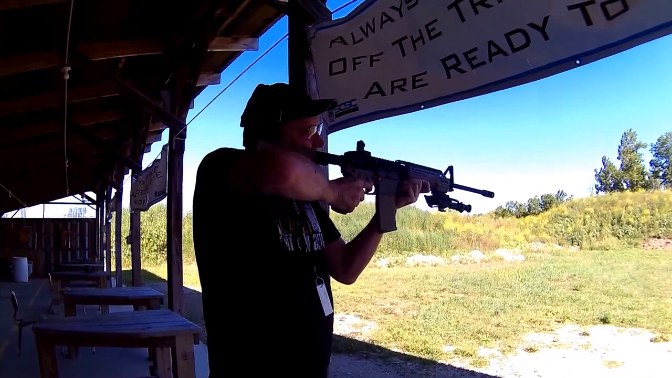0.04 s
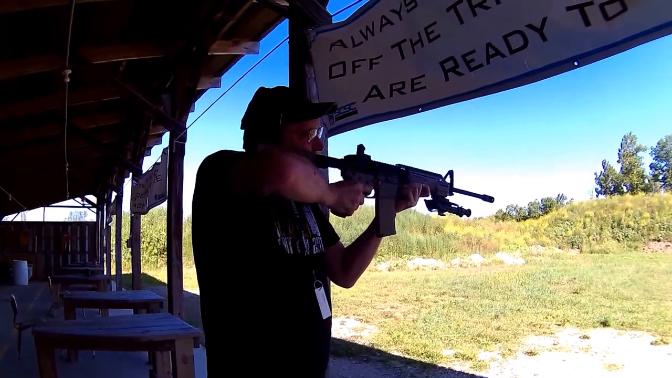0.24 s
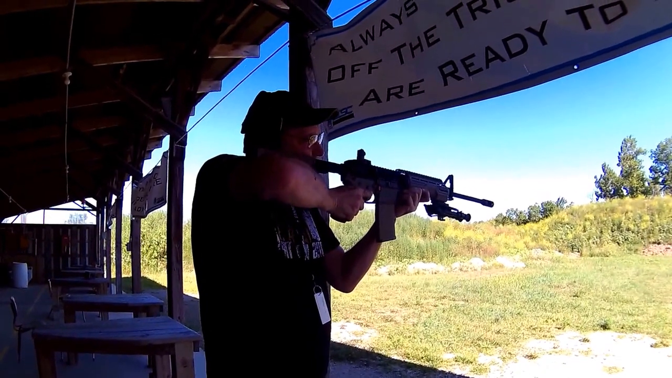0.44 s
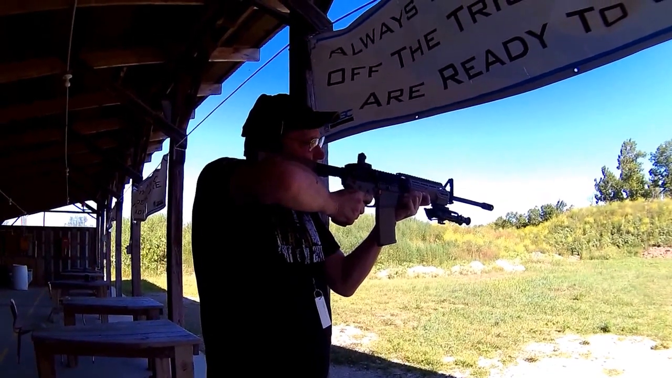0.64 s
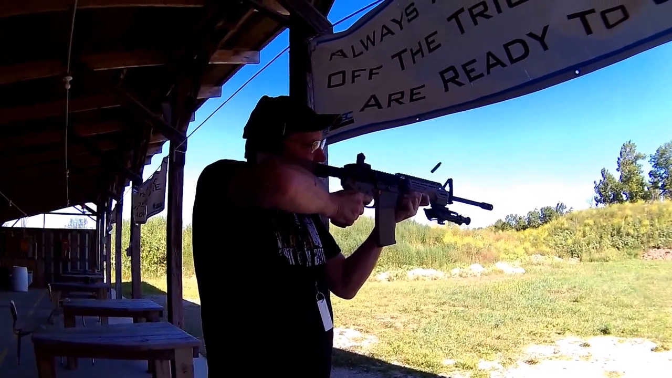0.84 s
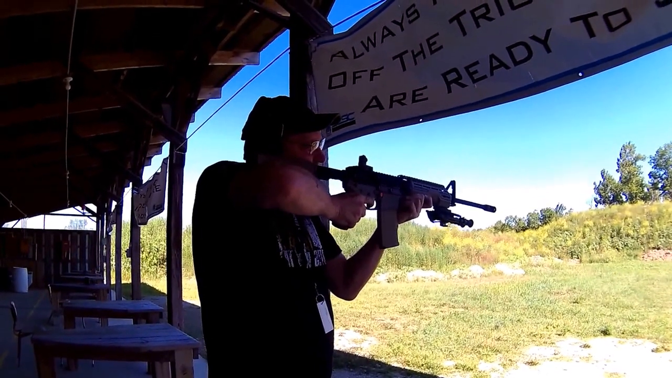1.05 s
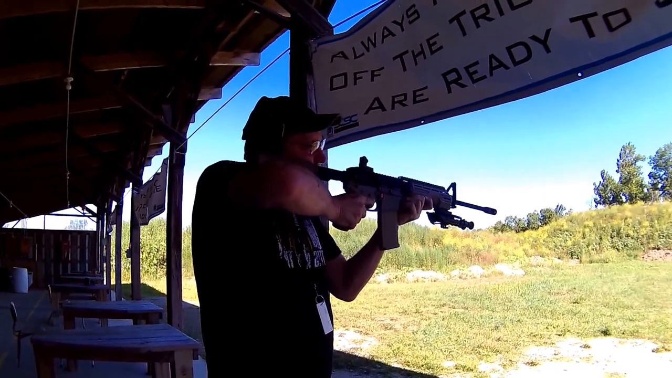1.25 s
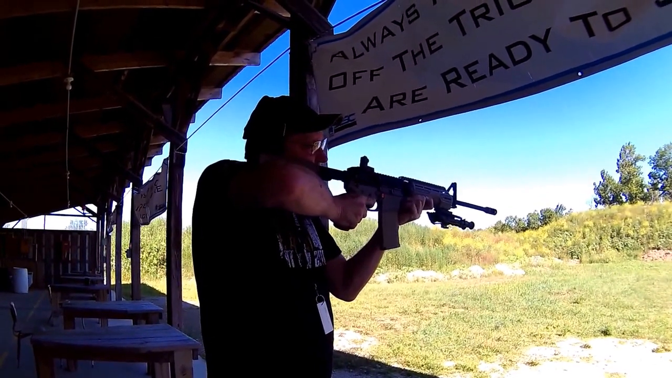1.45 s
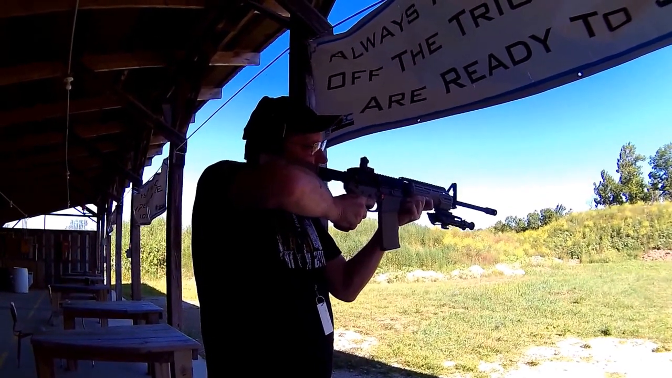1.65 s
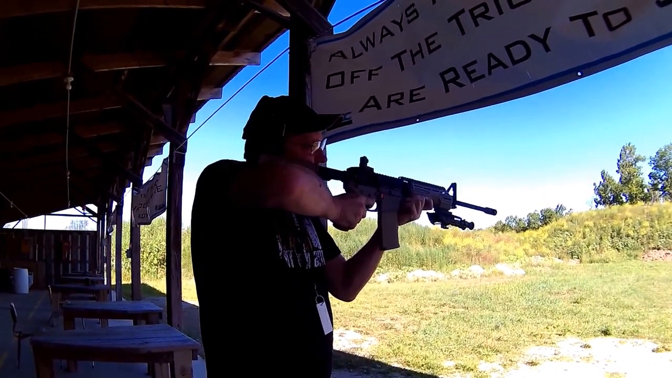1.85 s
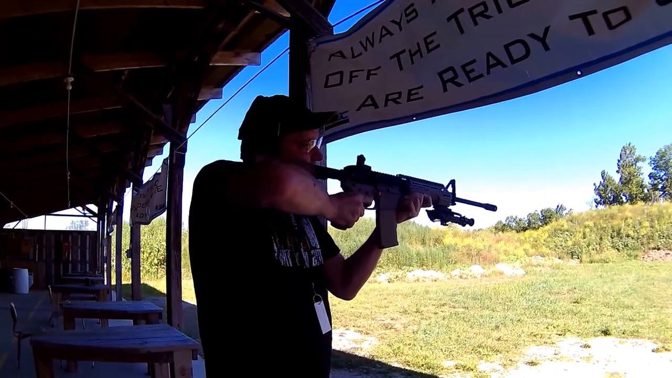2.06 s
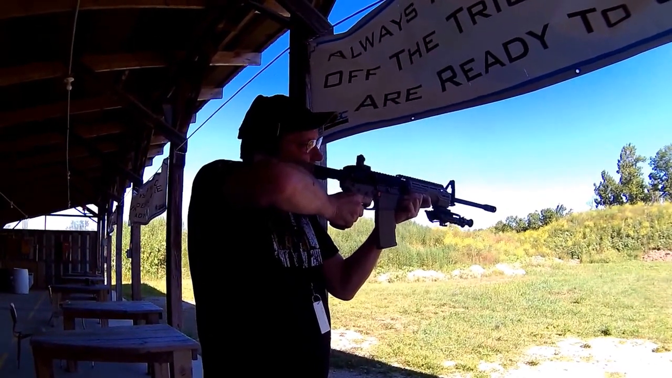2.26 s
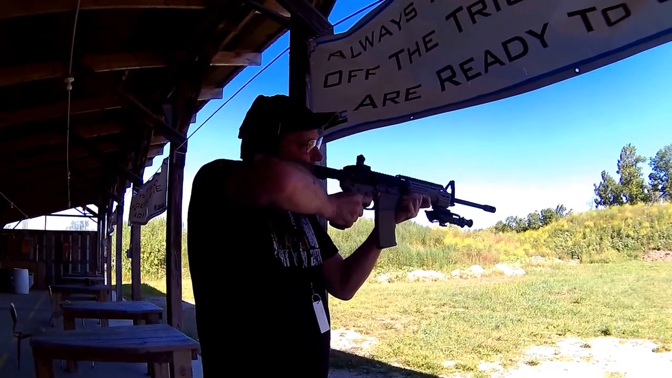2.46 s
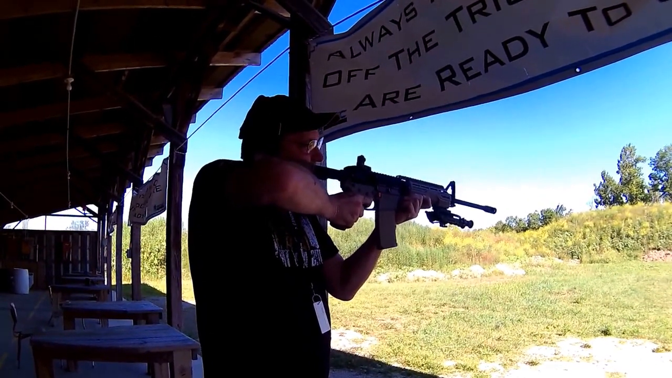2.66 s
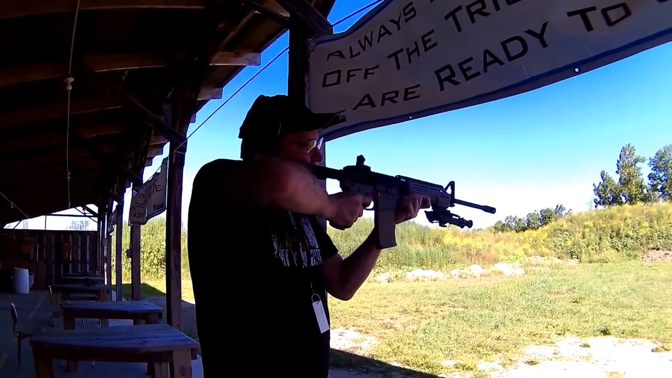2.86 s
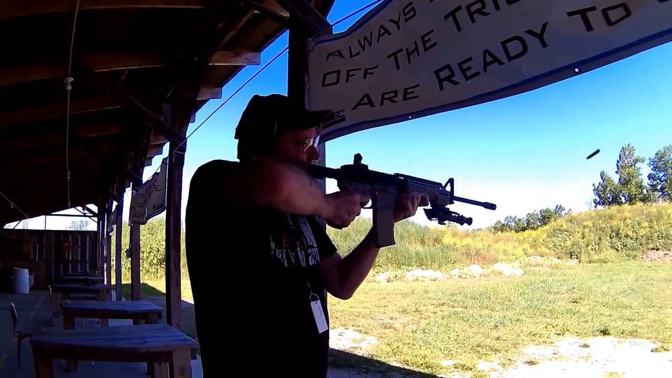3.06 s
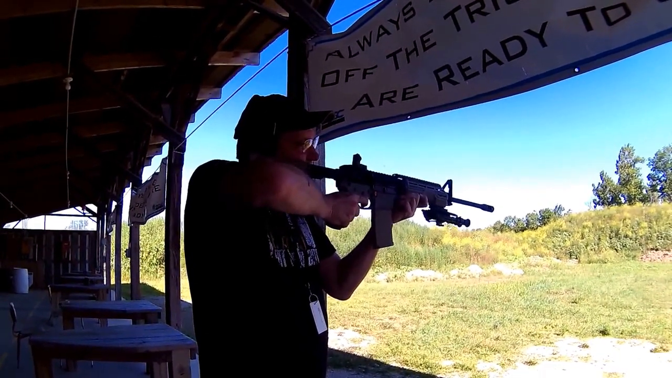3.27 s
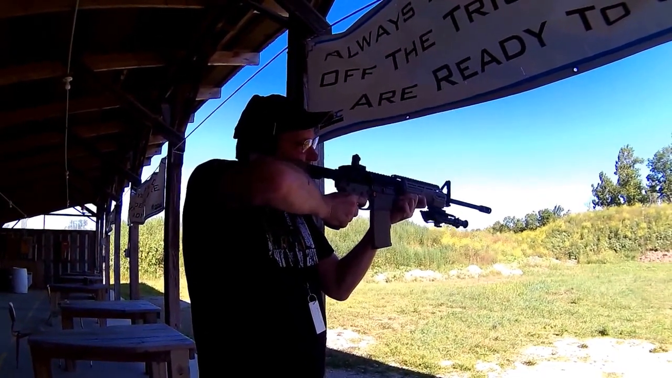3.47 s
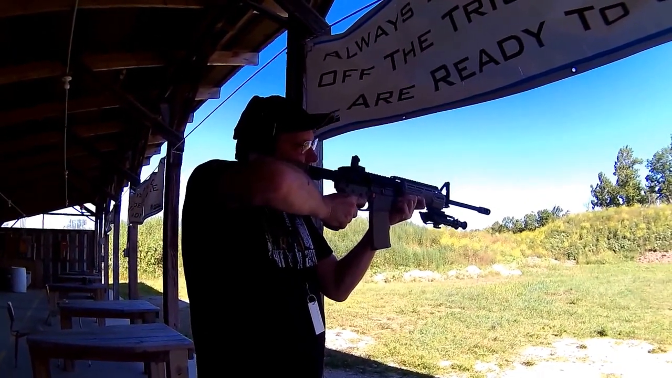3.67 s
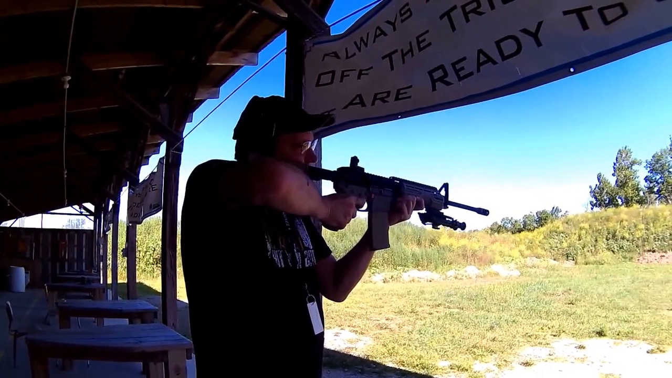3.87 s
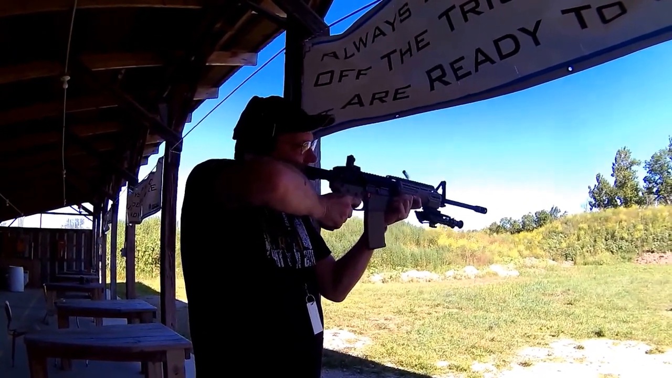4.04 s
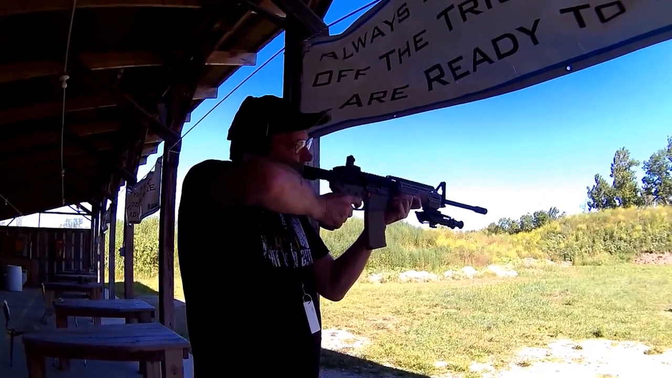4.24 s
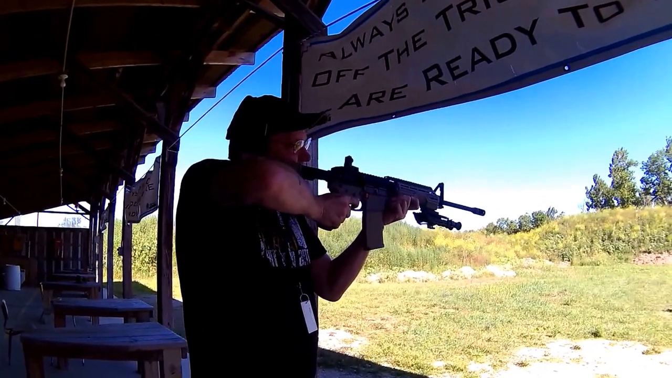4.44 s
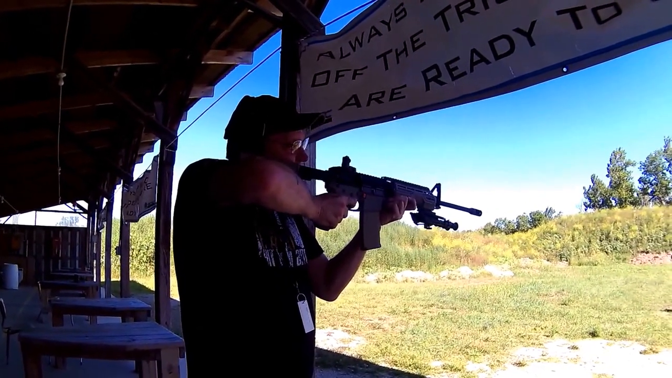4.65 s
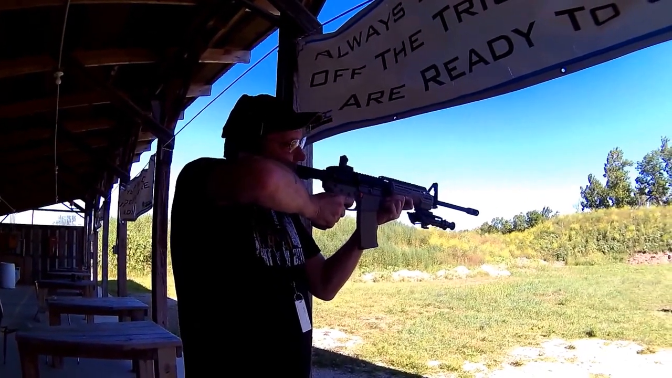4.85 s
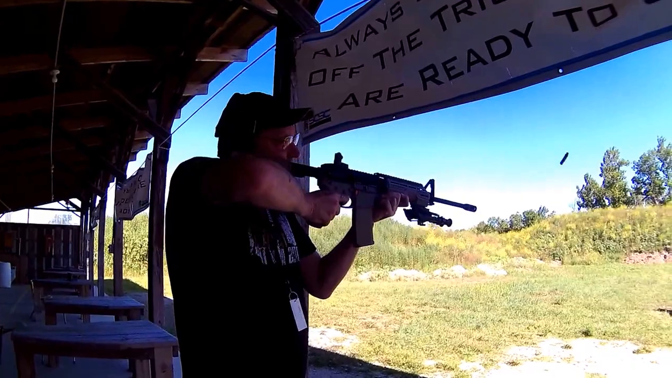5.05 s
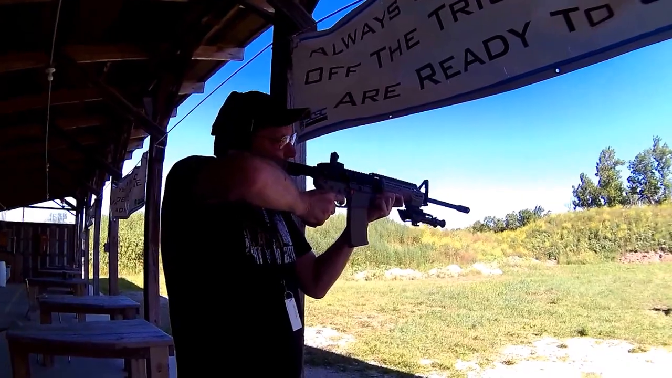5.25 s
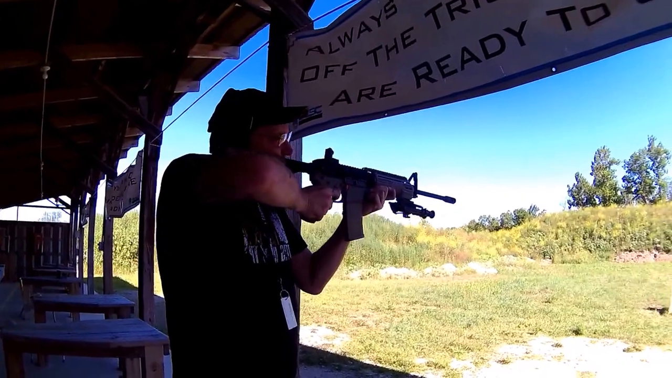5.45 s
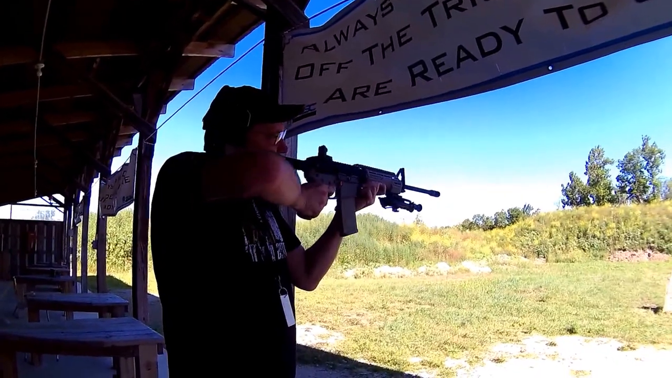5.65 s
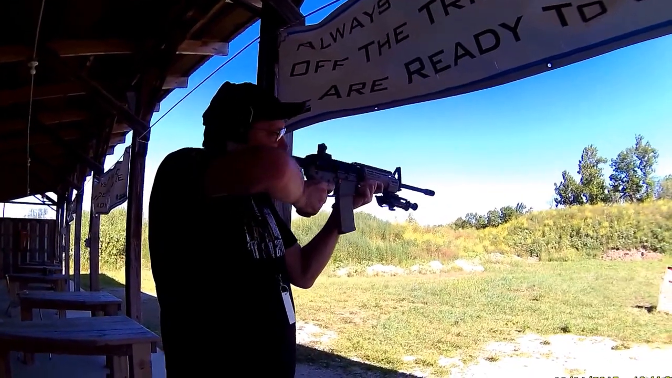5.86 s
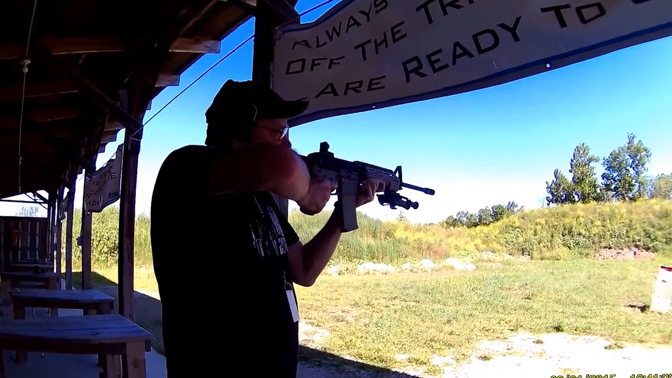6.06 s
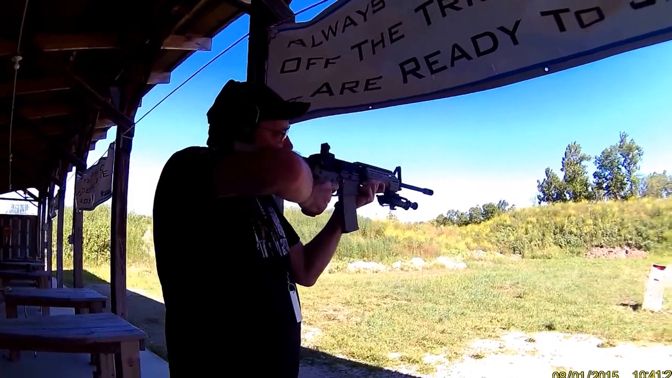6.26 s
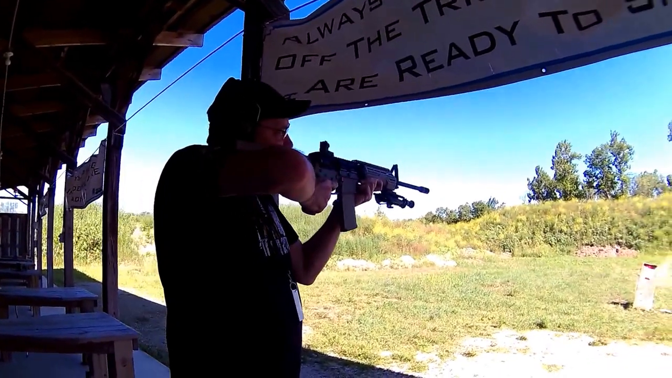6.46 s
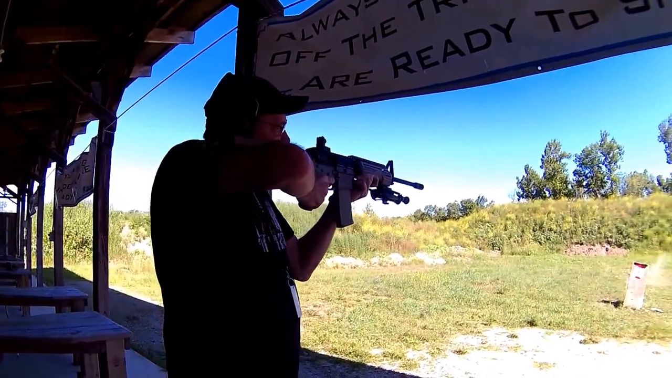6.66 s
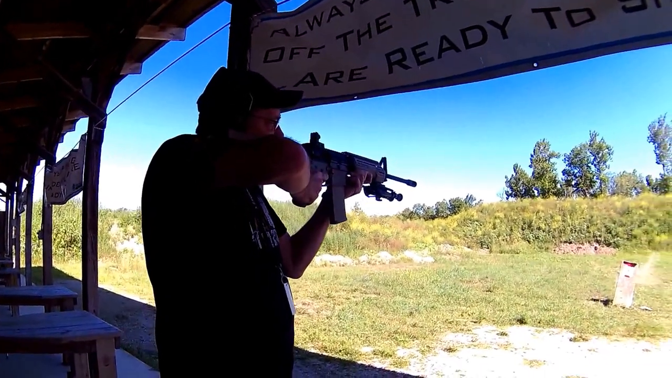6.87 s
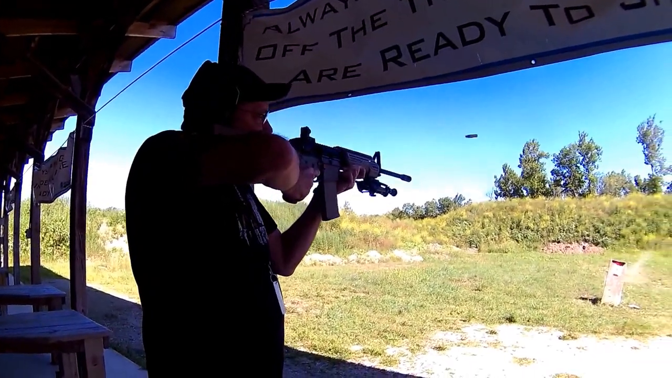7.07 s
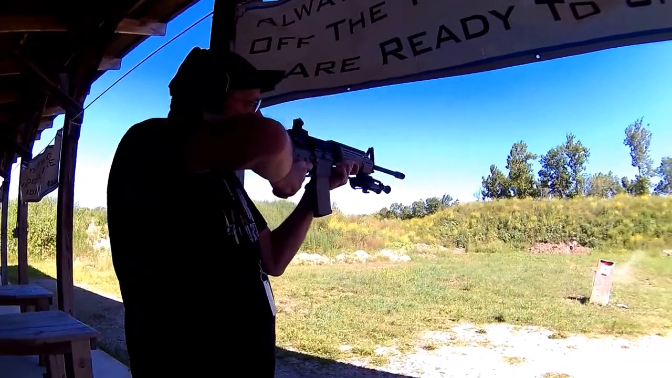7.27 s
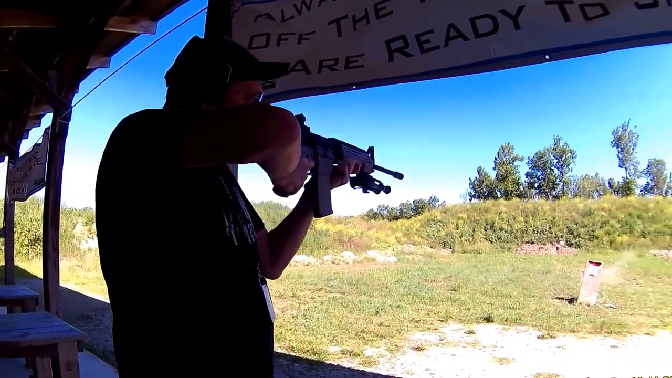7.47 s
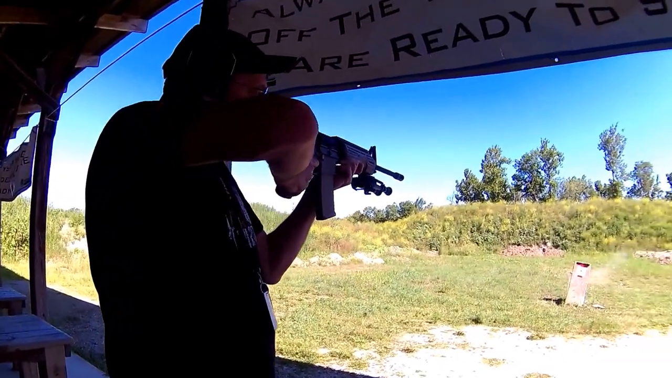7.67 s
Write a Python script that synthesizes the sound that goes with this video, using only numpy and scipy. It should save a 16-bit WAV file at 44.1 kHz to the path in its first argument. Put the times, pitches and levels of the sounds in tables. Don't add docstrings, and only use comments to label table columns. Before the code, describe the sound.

A rifle fires six loud, overloaded single shots at an outdoor range, with hard wall claps, fading landscape echoes and small ringing shell cases between.

```python
import sys
import numpy as np
from scipy import signal
from scipy.io import wavfile
from scipy.ndimage import uniform_filter1d

SR = 44100
rng = np.random.default_rng(int(sys.argv[2]) if len(sys.argv) > 2 else 0)


def amplitude_ratio(level_db):
    exponent = np.asarray(level_db, float) / 20
    return 10 ** exponent


def master(y):
    cut = np.clip(np.atleast_2d(y).T, -1, 1)
    pcm = np.round(cut * 32767)
    wavfile.write(sys.argv[1], SR, pcm.astype(np.int16))


N = 340126

# blast t/s, limiter wakes t/s
BLASTS = [(.7282, .8514), (1.8104, 1.8437), (2.8707, 2.9361), (3.9615, 3.9889), (4.8508, 4.8906),
          (6.8867, 6.9754)]
# blast level/dB, hammer level/dB, stretch of the near paths/1
SHOTS = [
    (-1.5, -16, 0.94),
    (1, -15, 0.92),
    (-2, -13, 0.99),
    (-1, -14, 1.02),
    (-1, -13, 0.981),
    (2.5, -16.5, 0.89),
]
# f/Hz, level/dB
PORT = [(2900, -1), (3300, -2.5), (3650, 0), (4100, 6.5), (4500, 1.5), (5100, 2), (7200, -1.5), (8200, -4),
        (12000, 3), (12900, -10.5), (16000, -18.5)]
# level/dB, walls/dB, treble/dB
AIM = [
    (-0.5, -2.5, -0.7),
    (.5, -2, -0.5),
    (0, 0, -0.15),
    (.5, 0, 0.1),
    (1, -7, .3),
    (0, -2.5, -0.9),
    (0, -.5, -1),
]
FAR_STRETCH = [1, 1, 1, 1, 1, 1, .98]
FAR_SHOTS = [-0.3] + [blast for blast, _ in BLASTS]


def evened(x):
    return x / np.sqrt(np.mean(x ** 2) + 1e-20)


def smoothed(x, size, axis=-1):
    return uniform_filter1d(uniform_filter1d(x, size=size, axis=axis), size=size, axis=axis)


def read(points, hz):
    f, value = np.transpose(points)
    return np.interp(np.log(hz + 1), np.log(f + 1), value)


def add(mix, s, sound):
    part = mix[round(s * SR):][:len(sound)]
    part += sound[:len(part)]


def hiss(colour_db, length, patchy_db, size=512):
    hop = size // 4
    frames = length // hop + 5
    hz = np.fft.rfftfreq(size, 1 / SR)[:, None]
    real, imaginary, patches = rng.standard_normal((frames, len(hz), 3)).T
    patches = uniform_filter1d(uniform_filter1d(patches, size=8, axis=0), size=8, axis=1)
    patches = evened(patches)
    gain = amplitude_ratio(colour_db(hz, np.arange(frames) * hop / SR)) * np.ones(real.shape)
    gain = gain / np.sqrt((gain ** 2).mean(0)) * amplitude_ratio(patchy_db * patches)
    spectrum = (real + 1j * imaginary) * gain
    return evened(signal.istft(spectrum, nperseg=size, noverlap=size - hop)[1][:length])


def ring(modes, length, rise=.0001):
    t = np.arange(length) / SR
    sines = sum(amplitude_ratio(db - 60 * t / t60) * np.sin(2 * np.pi * hz * t) for hz, db, t60 in modes)
    return (1 - np.exp(-t / rise)) * sines


def blasts():
    # delay t/s, level/dB
    near = [(0, -6), (.002, 12), (.08, 16), (.16, 5), (.225, -7), (.25, -9), (.265, -13.5), (.276, -18),
            (.289, -14)]
    # f/Hz, density/dB per Hz
    near_colour = [(18, -47.5), (30, -24), (70, -15), (345, -5.5), (866, -2), (1670, -5.5), (3000, -22),
                   (6900, -32.5), (16000, -53)]
    boom_share = [(500, 1), (1700, 0)]  # f/Hz, share/1

    def colour(hz, age):
        dulling_db = 48 * (age - .24) * hz / 8000
        late_db = -16 * np.maximum(1 - age / 0.031, 0)
        boom_db = 5.5 - 25.5 * age + late_db
        return read(near_colour, hz) + read(PORT, hz) - dulling_db + read(boom_share, hz) * boom_db

    out, t = np.zeros(N), np.arange(16000) / SR
    for (s, _), (blast_db, _, stretch) in zip(BLASTS, SHOTS):
        past = np.maximum(t / stretch - near[-1][0], 0)
        level_db = blast_db + np.interp(t / stretch, *np.transpose(near))
        level_db = level_db - 14 * np.minimum(past / 0.0022, 1) - 320 * past
        shock = 1.4 * (1 - t / 0.00013) * np.exp(-t / 0.00033) * np.minimum(t / .0004, 1)
        add(out, s, shock + hiss(colour, len(t), patchy_db=0.0) * amplitude_ratio(level_db))
    return out


def hammer_clicks():
    # f/Hz, level/dB, decay t60/s
    hammer = [(1740, -8, .025), (2664, -14.5, 0.015), (4630, 0, 0.0096), (5690, -15, 0.0092),
              (8720, -16, 0.0037), (11480, -3, 0.0033), (14600, -9.5, 0.00406)]
    out = np.zeros(N)
    for (s, _), (_, hammer_db, _) in zip(BLASTS, SHOTS):
        rattle = rng.standard_normal(size=500) * amplitude_ratio(-60 * np.arange(500) / SR / 0.014)
        click = np.convolve(ring(hammer, 900), rattle)
        add(out, s - .0084, amplitude_ratio(hammer_db) * click / abs(click).max())
    return out


def far_echoes():
    # delay t/s, hold t/s, level/dB, fall/dB per s, low middle/dB
    belts = [
        (.2, .07, -17, 304.5, -1.5),
        (.3, .09, -25.5, 153.5, -10),
        (0.43, 0.083, -26, 71.5, -8),
        (0.57, 0.12, -31.5, 122.5, -4.5),
        (0.726, 0.18, -38.5, 38, -5),
        (1.05, 0.31, -50.5, 26, 6.5),
    ]
    # t/s, hold t/s, level/dB, fall/dB per s, low middle/dB
    strikes = [(.035, 0.041, -30.5, 150, -8), (1.046, 0.064, -19.5, 198, -15.5),
               (1.19, .12, -30.5, 64.5, -14), (1.36, .05, -34, 152, -10.5), (2.142, 0.037, -25, 200, -22.5),
               (2.258, 0.015, -23.5, 200, -14), (4.245, 0.043, -8.5, 220, -15.5),
               (4.37, 0.037, -25, 92, -16.5), (7.208, 0.016, -36.5, 150, -14.5),
               (7.39, .04, -31.5, 119, -10)]
    # f/Hz, density/dB per Hz
    far_colour = [(18, -49.5), (30, -7.5), (110, -11.5), (250, -11), (400, -13.5), (650, -4.5),
                  (1100, -1.5), (1500, 0), (1900, -3.5), (2400, -9.5), (4000, -19), (7000, -25.5),
                  (12000, -47.5), (16000, -53.5)]
    # f/Hz, share/1
    share_treble = [(1300, 0), (2400, 0.3), (5000, 1), (12000, 3.3), (16000, 6.0)]
    share_bass = [(60, 0.56), (250, 1), (450, 0.219)]
    share_low = [(300, 0.076), (640, 1), (1000, 0.0018), (1500, 0)]

    rows = []
    for shot, (aim_db, _, _), stretch in zip(FAR_SHOTS, AIM, FAR_STRETCH):
        rows += [(shot + delay * stretch, hold, db + aim_db, *rest) for delay, hold, db, *rest in belts]
    start, hold, db, fall_db, low = np.transpose([*rows, *strikes])[..., None]
    s = np.arange(0, N / SR, 1 / 1000)
    rising_db = 897.5 * np.maximum(start - s, 0)
    falling_db = fall_db * np.maximum(s - start - hold, 0)
    power = amplitude_ratio(2 * (db - rising_db - falling_db)) + 1e-12
    low_db = (power * low).sum(0) / power.sum(0)

    last = np.searchsorted(FAR_SHOTS, s) - 1
    age = s - np.array(FAR_SHOTS)[last]
    air_s, forest_s = 1.45, 0.98
    treble_db = 8 + np.array(AIM)[last, 2] - 15 * np.minimum(age, air_s)
    treble_db = treble_db - 29 * np.clip(age - forest_s, 0, air_s - forest_s)
    bass_db = 7.5 - 25 * np.minimum(age, 0.61) + 0.5 * (low_db + 10.5)

    def colour(hz, t):
        treble = read(share_treble, hz) * np.interp(t, s, treble_db)
        bass = read(share_bass, hz) * np.interp(t, s, bass_db)
        low_middle = read(share_low, hz) * (np.interp(t, s, low_db) + 10.5)
        return read(far_colour, hz) + read(PORT, hz) + treble + bass + low_middle

    trunks = evened(uniform_filter1d(rng.standard_normal(3000), size=20))
    level_db = 10 * np.log10(power.sum(0)) + 0.34 * trunks[(age * 1000).astype(int)]
    grain = evened(uniform_filter1d(rng.standard_normal(N), size=150))
    level_db = np.interp(np.arange(N) / SR, s, level_db) + 0.48 * grain
    return hiss(colour, N, patchy_db=0.78) * amplitude_ratio(level_db)


def wall_claps():
    # delay t/s, peak level/dB
    walls = [
        (.314, -24),
        (.438, -16),
        (.848, -27),
        (.8712, -12.5),
        (1.466, -39),
        (1.608, -41),
    ]
    clap_modes = [(1020, -5, 0.009), (1880, -6, 0.006), (2700, -12, .005), (4080, -20, .006)]
    clap = ring(clap_modes, 900, rise=0.0004)
    out = np.zeros(N)
    for shot, (_, wall_db, _), stretch in zip(FAR_SHOTS, AIM, FAR_STRETCH):
        for delay, db in walls:
            arrival = shot + delay * stretch
            add(out, arrival + 0.00069, -amplitude_ratio(db + wall_db + 1.5) * clap)
            add(out, arrival + .005, amplitude_ratio(db + wall_db - 2.5) * clap)
    return out


def brass_cases():
    # t/s, lower ring level/dB, lower ring f/Hz, upper ring level/dB, tick level/dB
    landings = [(0.4032, -42, 10650, -26.5, -16.5), (.4565, -60, 10750, -43.5, -43),
                (.9, -49, 11550, -42.5, -46), (1.1485, -58, 10400, -56, -50),
                (1.3943, -39.5, 10670, -37, -30), (1.7404, -38.5, 10720, -41.5, -44),
                (2.5472, -45, 10680, -45, -39), (2.7453, -68, 10800, -63.5, -58),
                (3.6143, -38.5, 10800, -37.5, -31), (3.903, -66, 10750, -58, -56),
                (3.937, -66, 10750, -66, -50), (4.6793, -35, 10700, -47.5, -36),
                (5.219, -49.5, 10800, -59, -48), (5.492, -61, 10790, -75, -60),
                (5.5476, -38, 10700, -28, -18), (5.557, -48, 10700, -30, -40), (6.04, -81, 10750, -66, -75),
                (7.6502, -61, 10800, -50.5, -62)]
    # f/Hz, level/dB, decay t60/s
    tick = [(4600, -5, .003), (6500, -2, .003), (8800, 1, .003), (11300, 2, .004)]
    out, length = np.zeros(N), 14000
    fresh = np.exp(-np.arange(length) / SR / .012)
    for s, low_db, low_hz, high_db, tick_db in landings:
        high_hz = 15080 + rng.uniform(-130, 130)
        # f/Hz, level/dB, decay t60/s, spread of the cluster f/Hz
        for hz, db, t60, split_hz in [(low_hz, low_db, 0.29, 110), (high_hz, high_db, .2, 130)]:
            below, above = rng.uniform(.6, 1.57, 2) * split_hz
            cluster = ring([(hz, db, t60), (hz - below, db - 5, .8 * t60), (hz + above, db - 5, 0.8 * t60),
                            (hz + 2.3 * above, db - 8, .5 * t60)], length)
            tumble = evened(smoothed(rng.standard_normal(length), 140))
            add(out, s, cluster * amplitude_ratio(4 * tumble * (1 - fresh) + 4 * fresh))
        add(out, s, amplitude_ratio(tick_db) * ring(tick, 200, rise=.00003))
    return out


def metal_ticks():
    # t/s, peak level/dB, centre f/Hz
    ticks = [(.418, -18, 9720), (.4055, -22, 5200), (1.4073, -21, 7270), (1.7396, -23.5, 2300),
             (1.739, -22, 6264), (3.6165, -34, 7100), (3.627, -36, 6500), (4.2673, -4, 11100),
             (5.558, -24, 7000), (5.5616, -20, 10050), (7.1155, -1, 6000)]
    out = np.zeros(N)
    for s, db, hz in ticks:
        modes = [(hz, 0, .005), (.8 * hz, -5, .004), (1.1 * hz, -6, .004)]
        add(out, s, amplitude_ratio(db) * ring(modes, 400, rise=.0003))
    return out


def under_roof(sound):
    t = np.arange(3000) / SR
    sparse = rng.standard_normal(len(t)) * (rng.random(len(t)) < .05) * (t > .002)
    roof = amplitude_ratio(-17.5 - 60 * t / 0.11) * sparse
    return sound + signal.oaconvolve(sound, roof)[:N]


def rustles():
    # t/s, length t/s, level/dB
    bursts = [
        (6.36, 0.13, -66),
        (7.135, 0.039, -22.5),
        (7.637, 0.018, -47),
    ]
    # f/Hz, density/dB per Hz
    rustle_colour = [(1200, -20), (2500, 0), (4200, 4), (7000, -8), (12000, -19), (15000, -32)]
    out = np.zeros(N)
    for s, length, db in bursts:
        count = round(length * SR)
        rustle = hiss(lambda hz, t: read(rustle_colour, hz), count, patchy_db=2.5)
        add(out, s, amplitude_ratio(db) * rustle * np.sqrt(np.hanning(count)))
    return out


def birds():
    # t/s, length t/s, start f/Hz, end f/Hz, level/dB
    chirps = [
        (6.056, 0.033, 6050, 6000, -64),
        (6.061, .03, 6400, 7200, -67),
        (6.075, 0.0302, 6200, 7000, -64),
        (6.142, .018, 3900, 4250, -58),
        (6.165, 0.027, 4150, 4170, -66),
    ]
    out = np.zeros(N)
    for s, length, start_hz, end_hz, db in chirps:
        glide = np.linspace(start_hz, end_hz, round(length * SR))
        hoarse = evened(uniform_filter1d(rng.standard_normal(3000), size=80))
        glide = glide + 55 * hoarse[:len(glide)]
        add(out, s, amplitude_ratio(db) * np.sin(2 * np.pi * np.cumsum(glide) / SR) * np.hanning(len(glide)))
    return out


def camera_whine():
    # f/Hz, level/dB
    whine = [(9905, -87), (9981, -76.5), (10018, -87), (10056, -79), (10137, -92)]
    t = np.arange(N) / SR
    return sum(np.sqrt(2) * amplitude_ratio(db + 4.0) * np.sin(2 * np.pi * (hz * t + rng.random())) for hz, db in whine)


def far_hum():
    # f/Hz, density/dB per Hz
    hum = [(15, -24), (30, 3), (97, -2.5), (160, -5.5), (250, -12), (420, -17), (650, -17.5), (950, -12),
           (1750, -26), (2600, -31.5), (5800, -35.5), (6600, -33), (8500, -37.5), (16000, -38.5)]
    return amplitude_ratio(-51) * hiss(lambda hz, t: read(hum, hz), N, patchy_db=0.8, size=2048)


def scene():
    rifle = blasts() + hammer_clicks()
    landscape = far_echoes() + wall_claps()
    brass = under_roof(brass_cases() + metal_ticks())
    background = rustles() + birds() + camera_whine() + far_hum()
    return (rifle + landscape + brass + background)[None]


def roll_off(x):
    return signal.sosfilt(signal.butter(12, 16400, fs=SR, output="sos"), x)


def record(dry):
    ceiling, held_db = 0.71, -14.5
    clipped = np.clip(dry[0], -ceiling, ceiling)
    sagging = signal.lfilter(*signal.butter(1, 14 / SR * 2, "high"), clipped)
    power_db = 10 * np.log10(abs(uniform_filter1d(sagging ** 2, size=1800)) + 1e-12)
    cut_db = np.maximum(power_db - held_db, 0)
    for blast, wake in BLASTS:
        cut_db[round((blast - .03) * SR):round(wake * SR)] = 0
    limited = sagging * amplitude_ratio(-cut_db)
    band_edge = signal.firwin(255, 15850, window=("kaiser", 7), fs=SR)
    dulled = signal.oaconvolve(limited, band_edge, "same")
    sudden = np.zeros(N)
    for blast, _ in BLASTS:
        add(sudden, blast - .004, np.hanning(400))
    mix = dulled + amplitude_ratio(-17.5) * sudden * (limited - dulled)
    return roll_off(np.clip(mix, -.94, .94)[None])


dry = scene()
out = record(dry)
master(out)
```